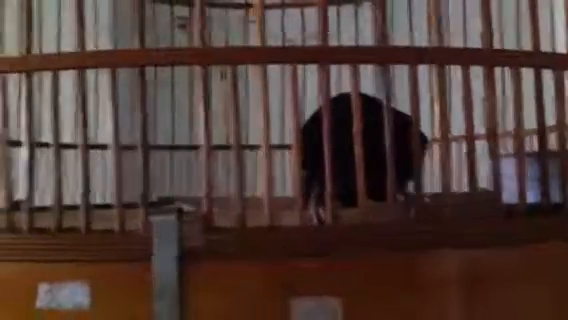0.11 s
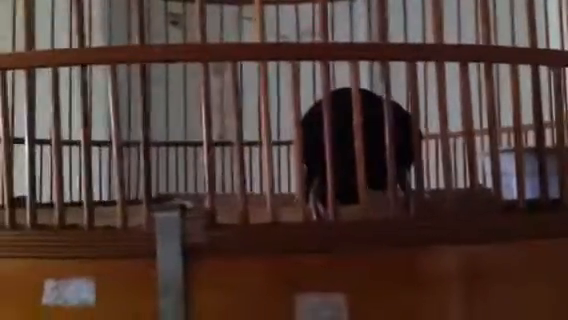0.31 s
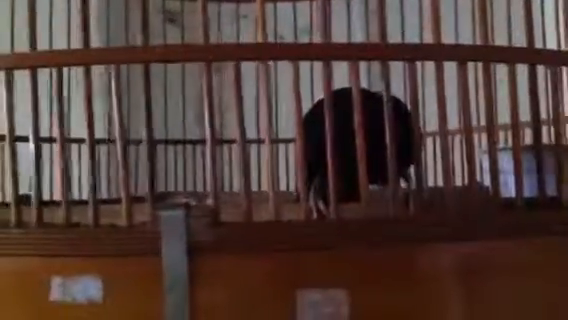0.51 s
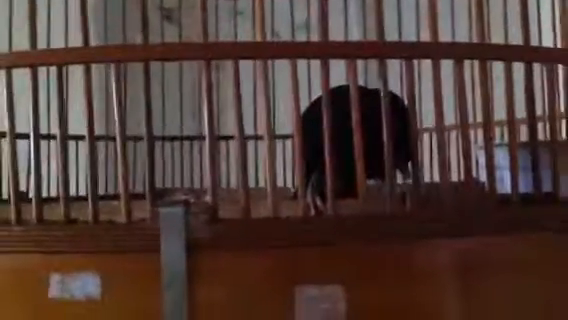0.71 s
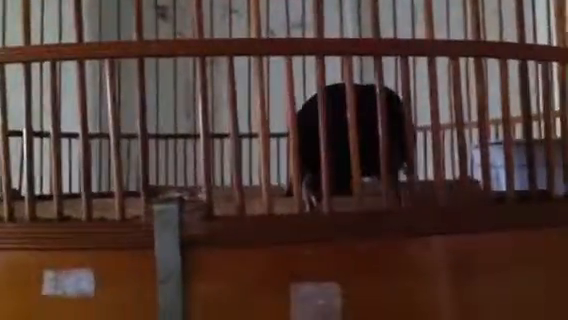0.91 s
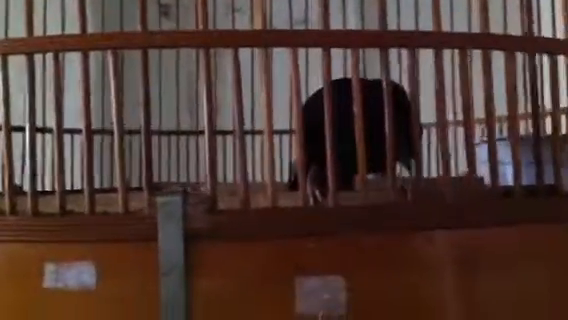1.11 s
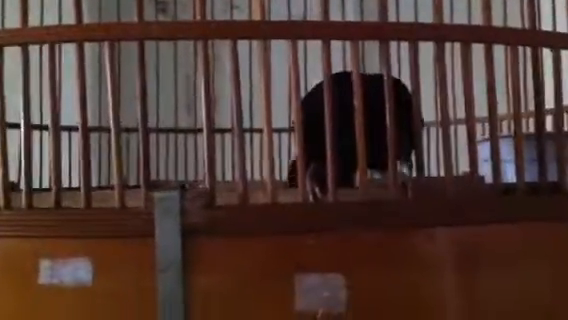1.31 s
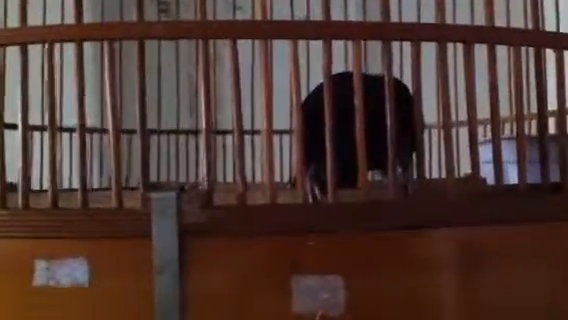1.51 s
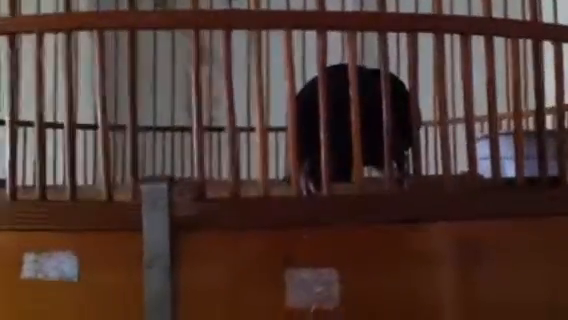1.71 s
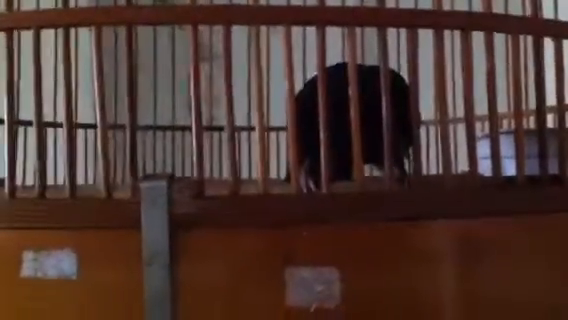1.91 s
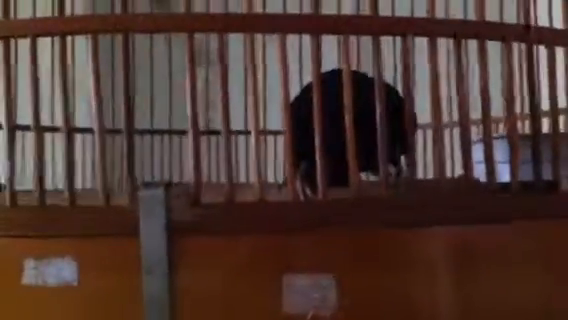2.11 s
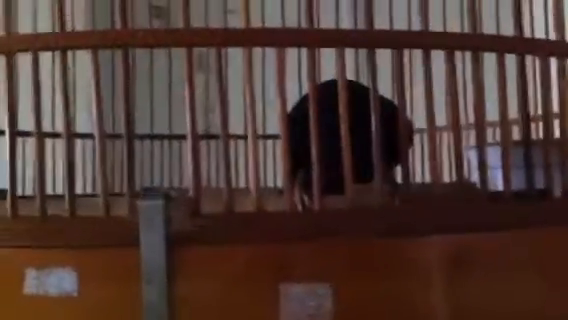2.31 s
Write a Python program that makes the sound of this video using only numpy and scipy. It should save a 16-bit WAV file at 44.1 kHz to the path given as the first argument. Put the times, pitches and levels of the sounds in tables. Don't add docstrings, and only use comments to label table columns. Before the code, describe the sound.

A songbird sings close to the microphone in a bare, echoing room: soft low warbles over a far bird's faint peeps, then five loud rising and falling whistles with harsh breaks, a buzzy stutter and shrill warble.

```python
import sys
import numpy as np
from scipy import signal
from scipy.fft import rfft, irfft
from scipy.io import wavfile
from scipy.ndimage import uniform_filter1d, minimum_filter1d

SR = 44100
rng = np.random.default_rng(int(sys.argv[2]) if len(sys.argv) > 2 else 0)


def store_pcm(level_fs):
    pcm = np.round(np.clip(level_fs, -1, 1) * 32767).astype(np.int16)
    wavfile.write(sys.argv[1], SR, np.atleast_2d(pcm).T)


def linear_from_db(decibels):
    return 10 ** (np.asarray(decibels, float) / 20)


N = 108045
LOUD_DB = -1.5
TOP_HZ = 15750


def rms_one(x):
    return x / np.sqrt(np.mean(x ** 2) + 1e-20)


def at_hz(points, hz):
    table = np.array(points)
    return np.interp(np.log(np.maximum(hz, 1)), np.log(table[:, 0]), table[:, 1])


def coloured(spectrum, low_hz):
    hz = np.arange(N // 2 + 1) * SR / N
    white = rfft(rng.standard_normal(N))
    return rms_one(irfft(white * linear_from_db(at_hz(spectrum, hz)) * (hz > low_hz), N))


def resonant(hz, width_hz):
    radius = np.exp(-np.pi * width_hz / SR)
    poles = [1, -2 * radius * np.cos(2 * np.pi * hz / SR), radius * radius]
    noise = rng.standard_normal(N + 4096)
    for _ in range(2):
        noise = signal.lfilter([1, 0, -1], poles, noise)
    return rms_one(noise[4096:])


def drift(rate_hz):
    pole = np.exp(-2 * np.pi * rate_hz / SR)
    slow = signal.lfilter([1], [1, -2 * pole, pole * pole], rng.standard_normal(N + 4096))
    return rms_one(slow[4096:])


def gated(rows, edge_s):
    t = np.arange(N) / SR
    gain = np.zeros(N)
    for start, length, db in rows:
        gain += linear_from_db(db) * np.clip(np.minimum(t - start, start + length - t) / edge_s, 0, 1)
    return gain


def room_tone():
    # (frequency [Hz], density [dB per Hz])
    tone_colour = [(18, -76.5), (30, -41), (285, -19.5), (1270, -43.5), (1480, -29), (1830, -53.5),
                   (2140, -7), (2370, -23), (15600, -40)]
    return linear_from_db(-57.5) * coloured(tone_colour, low_hz=90)


def rustle():
    # (start [s], length [s], level [dB])
    stirrings = [
        (.1, 0.12, -49.5),
        (.43, 0.14, -50.5),
        (.74, 0.072, -49),
        (.97, 0.088, -49.5),
        (1.24, 0.11, -55),
        (2.19, 0.13, -55),
        (2.41, 0.075, -51),
    ]
    # (frequency [Hz], density [dB per Hz])
    rustle_colour = [(2500, 1), (8000, -4), (16000, -28)]
    return gated(stirrings, 0.02) * coloured(rustle_colour, low_hz=2380)


def lingering_notes():
    t = np.arange(N) / SR
    return linear_from_db(-47 - 4 * t) * resonant(1558, width_hz=390)


def far_bird():
    # (start [s], length [s], level [dB])
    peep_times = [
        (-.012, 0.024, -37),
        (.044, 0.051, -36.5),
        (.094, 0.036, -39),
        (.155, 0.038, -42.5),
        (.188, 0.051, -37),
        (.25, 0.049, -49),
        (.297, 0.059, -37.5),
        (.36, 0.023, -41.5),
        (.49, 0.026, -33),
        (.54, 0.062, -36),
    ]
    pitch_hz, blur_db, ring_db, ring_end_s = 2130, -8.5, -48, .59
    t = np.arange(N) / SR
    blur = resonant(pitch_hz, width_hz=100)
    whistle = np.sqrt(2) * np.sin(2 * np.pi * pitch_hz * t)
    peeps = gated(peep_times, edge_s=0.0088) * (whistle + linear_from_db(blur_db) * blur)
    return peeps + linear_from_db(ring_db) * (t < ring_end_s) * blur


def room(x):
    # (frequency [Hz], t60 [s])
    decay_times = [(800, 0.42), (2500, 0.41), (6000, 0.41), (14000, 0.41)]
    # (frequency [Hz], level [dB])
    wall_colour = [(700, 0), (2800, 1), (5600, -4), (11000, -3)]
    level_db, onset_s = -3.5, 0.0012
    t = np.arange(SR) / SR
    white = rng.standard_normal(SR)
    tail = np.zeros(SR)
    for hz in 350 * 2. ** np.arange(6):
        octave = signal.butter(2, [hz, min(2 * hz, .45 * SR)], "band", fs=SR, output="sos")
        t60 = at_hz(decay_times, hz * np.sqrt(2))
        tail += signal.sosfilt(octave, white) * linear_from_db(at_hz(wall_colour, hz) - 60 * t / t60)
    tail *= np.clip(t / onset_s - 1, 0, 1)
    return linear_from_db(level_db) * signal.fftconvolve(x, tail / np.sqrt(np.sum(tail ** 2)))[:N]


def air_hiss(effort):
    # (frequency [Hz], density [dB per Hz])
    hiss_colour = [(3500, -28), (7000, 3), (10000, -43), (16000, -9.5)]
    return linear_from_db(-37) * effort * coloured(hiss_colour, low_hz=3300)


def buzz(effort):
    # (start [s], length [s], level [dB])
    buzz_times = [
        (.6, .065, -50),
        (.81, .08, -56),
        (1.04, 0.11, -44),
        (1.3, 0.11, -50),
        (1.53, 0.23, -36),
        (1.715, 0.14, -31.5),
        (1.94, .24, -34),
    ]
    # (frequency [Hz], density [dB per Hz])
    buzz_colour = [(8000, -22), (9300, 0), (13500, -2), (15600, -11)]
    follows = .8
    push = uniform_filter1d(effort, size=300) / linear_from_db(2 * LOUD_DB) + 0.13
    return gated(buzz_times, edge_s=.015) * np.abs(push) ** follows * coloured(buzz_colour, low_hz=7000)


def breaks():
    # (start [s], length [s], centre [Hz], level [dB])
    break_times = [
        (0.839, 0.021, 3300, -26.5),
        (1.069, 0.054, 2930, -19.5),
        (1.314, 0.042, 3130, -28.5),
        (1.555, 0.082, 2930, -30),
        (1.931, 0.021, 2710, -30.5),
        (1.984, 0.022, 3840, -38.5),
    ]
    width_hz, overtone_db = 490, -11.5
    t = np.arange(N) / SR
    out = np.zeros(N)
    for start, length, hz, db in break_times:
        band = resonant(hz, width_hz)
        over = resonant(2 * hz, 2 * width_hz) + resonant(3 * hz, 2 * width_hz)
        swell = np.sin(np.pi * np.clip((t - start) / length, 0, 1))
        out += linear_from_db(db) * swell * (band + linear_from_db(overtone_db) * over)
    return out


def song():
    # (time [s], pitch [Hz], level [dB])
    warbles = [
        [(0.15, 731, -54), (0.178, 936, -19.5), (0.2, 961, -26.5)],
        [(0.21, 1097, -26), (0.232, 1256, -19.5), (.249, 1183, -20), (0.265, 1200, -24)],
        [(0.27, 777, -39), (0.288, 937, -15), (0.312, 1140, -34.5)],
        [(0.335, 781, -35.5), (.35, 886, -17), (0.36, 896, -13), (0.37, 950, -27)],
        [(0.393, 1738, -28.5), (.408, 2083, -7), (0.415, 2406, -14), (0.425, 2634, -21)],
        [(0.45, 781, -59), (0.456, 846, -36), (0.49, 741, -27.5)],
        [(0.552, 721, -38), (0.592, 878, -23.5)],
    ]
    # (time [s], pitch [Hz], level [dB])
    first_whistle = [(0.594, 2097, -35), (0.602, 2395, -8.5), (0.61, 2223, -11.5), (.629, 2785, -5.5),
                     (0.638, 2874, -7.5), (0.65, 2025, -26.5), (0.66, 983, -36), (0.668, 920, -16.5),
                     (0.688, 807, -31)]
    # (time [s], pitch [Hz], level [dB])
    rises = [
        [(0.76, 763.4, -45), (0.79, 900, -20), (0.804, 1832, -60), (0.81, 2350, -11.5), (0.818, 2341, -13.5),
         (0.842, 2632, -7.5), (0.85, 2580, -11.5), (0.868, 3005, -9)],
        [(0.995, 752, -51), (1.021, 913, -17), (1.029, 1473, -53), (1.037, 2242, -22), (1.041, 2430, -19.5),
         (1.049, 2333, -22), (1.083, 2630, -2), (1.112, 2653, -14.5)],
        [(1.255, 733, -45), (1.283, 899, -21.5), (1.287, 1245, -34.5), (1.293, 1814, -48), (1.303, 2300, -19.5),
         (1.315, 2389, -13), (1.329, 2455, -9), (1.352, 2970, -11.5)],
        [(1.495, 813, -28.5), (1.515, 1019, -22.5), (1.525, 1920, -40), (1.531, 2102, -17), (1.549, 2353, -11),
         (1.555, 2517, -14), (1.561, 2571, -6), (1.584, 2617, -13.5)],
    ]
    # (time [s], pitch [Hz], level [dB])
    falls = [
        [(.428, 2440, -28), (.44, 1865, -27), (.455, 1900, -32.5), (.468, 2203, -25), (.478, 2230, -46)],
        [(0.852, 3535, -28.5), (0.866, 2850, -15.5), (0.89, 930.5, -41.5), (0.895, 951, -21.5),
         (0.91, 921, -19)],
        [(1.104, 3622, -30), (1.126, 2907, -15.5), (1.138, 1942, -38.5), (1.146, 1034, -31.5),
         (1.166, 824, -21.5)],
        [(1.342, 3260, -22.5), (1.36, 2867, -7), (1.374, 2207, -32.5), (1.386, 1023, -35), (1.412, 912, -19)],
        [(1.578, 2963, -20.5), (1.594, 3182, -10.5), (1.61, 2377, -14), (1.624, 1660, -24), (1.64, 1418, -23),
         (1.652, 1420, -19)],
    ]
    # (time [s], pitch [Hz], level [dB])
    stutter = [
        [(1.716, 1490, -13.5), (1.724, 1760, -24.5), (1.726, 1770, -24), (1.734, 1460, -20.5),
         (1.74, 1410, -14), (1.742, 1500, -18)],
        [(1.743, 1973, -24), (1.753, 2363, -24), (1.769, 2283, -20.5), (1.771, 2470, -22), (1.775, 2600, -17),
         (1.779, 2730, -31)],
    ]
    # (time [s], pitch [Hz], level [dB])
    closing = [
        [(1.782, 3290, -22.5), (1.79, 2730, -18.5), (1.798, 2684, -28.5), (1.802, 2650, -16.5),
         (1.808, 2580, -18)],
        [(1.812, 1733, -31.5), (1.82, 1819, -21), (1.828, 1470, -13), (1.834, 1530, -16), (1.848, 1435, -25)],
        [(1.945, 1841, -20), (1.949, 1896, -10.5), (1.959, 1975, -17.5), (1.967, 2266, -11), (1.971, 2324, -20),
         (1.973, 2456, -14), (1.983, 2460, -17.5)],
        [(1.996, 2997, -34), (2.008, 3195, -16.5), (2.024, 2726, -17.5), (2.028, 2650, -28), (2.037, 2470, -13)],
        [(2.108, 3260, -25), (2.11, 3300, -39), (2.116, 2907, -13.5), (2.13, 2486, -19.5), (2.136, 2390, -15.5),
         (2.14, 2300, -38)],
        [(2.143, 1765, -10), (2.155, 1557, -17.5), (2.171, 1593, -15.5), (2.175, 1610, -46)],
    ]
    # (time [s], pitch [Hz], level [dB])
    closing_turn = [(2.039, 1674, -14), (2.057, 1698, -11), (2.059, 1693, -12), (2.069, 2144, -17),
                    (2.073, 2249, -19.5), (2.083, 2238, -16.5), (2.091, 2105, -27), (2.095, 2056, -22),
                    (2.116, 2066, -25)]
    # (frequency [Hz], level [dB])
    beak_colour = [(1500, -24), (2800, -28), (4500, -26), (6500, -28), (8000, -26.5), (9500, -21),
                   (12000, -22), (16000, -30)]
    edge_s, round_s = 0.0056, .003
    overtone_swell = 0.23
    flash_hz, flash_db, fade_db_per_s, rest_db = 1900, -8.5, 326, -8
    late_mid_db, shrill_db, shrill_hz = -4.5, 7, 8670
    whistle_hz = 1600

    t = np.arange(N) / SR
    out, effort = np.zeros(N), np.zeros(N)
    wobble = 1 + .003 * drift(130)
    flutter = linear_from_db(3 * drift(65.9))
    shred = [.75 + .25 * drift(120) for _ in range(10)]
    rasp = [drift(300) for _ in range(10)]
    early = warbles + [first_whistle] + rises
    late_from = len(early + falls)
    for n, note in enumerate(early + falls + stutter + closing + [closing_turn]):
        s, hz, db = np.transpose(note)
        on = (t > s[0] - edge_s) & (t < s[-1] + edge_s)
        now = t[on]
        glide, db = (uniform_filter1d(np.interp(now, s, curve), size=int(round_s * SR), mode="nearest")
                     for curve in (np.log(hz), db))
        pitch = np.exp(glide) * wobble[on]
        inside = np.minimum(now - s[0], s[-1] - now)
        edge = np.sin(np.pi / 2 * np.clip(inside / edge_s / 2 + .5, 0, 1)) ** 2
        level = linear_from_db(db) * edge * flutter[on]
        loudness = level / linear_from_db(LOUD_DB)
        swollen = level * loudness ** overtone_swell
        since = np.cumsum(np.cumsum(glide > np.log(flash_hz)) > 0) / SR * (n < len(early))
        flash = edge * linear_from_db(flash_db - fade_db_per_s * since) * np.clip(since / edge_s, 0, 1)

        phase = 2 * np.pi * np.cumsum(pitch) / SR
        tone = level * np.sin(phase)
        for k in range(2, 10):
            strength = swollen if k < 4 else flash + linear_from_db(rest_db) * swollen * rasp[k][on]
            if n >= late_from:
                shrill = level * linear_from_db(shrill_db) * (k * pitch > shrill_hz) * loudness
                strength = strength * linear_from_db(late_mid_db) + shrill
            strength = strength * linear_from_db(at_hz(beak_colour, k * pitch)) * shred[k][on]
            tone += strength * (k * pitch < TOP_HZ) * np.sin(k * phase)
        out[on] += np.sqrt(2) * tone
        effort[on] += level * np.clip(pitch / whistle_hz, 0, 1) ** 2
    return out, effort


def scene():
    voice, effort = song()
    bird = voice + buzz(effort) + air_hiss(effort) + breaks()
    background = room_tone() + rustle() + lingering_notes() + far_bird()
    return (background + bird + room(bird))[None]


def band_limit(x):
    return signal.sosfilt(signal.butter(12, 15760, fs=SR, output="sos"), x)


def record(dry):
    peak = 1e-9 - minimum_filter1d(-np.abs(dry), size=301)
    gain = np.minimum(1, .74 / peak)
    held = dry * uniform_filter1d(gain, size=301)
    thump_band = signal.butter(2, [90, 500], "band", fs=SR, output="sos")
    thump = signal.sosfilt(thump_band, held ** 2)
    top_cut = signal.ellip(14, .5, 70, TOP_HZ, fs=SR, output="sos")
    mix = signal.sosfilt(top_cut, held + linear_from_db(-60) * thump * 10)
    return band_limit(mix)


dry = scene()
out = record(dry)
store_pcm(out)
```